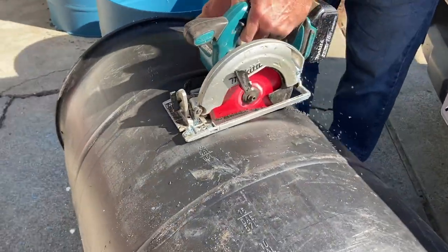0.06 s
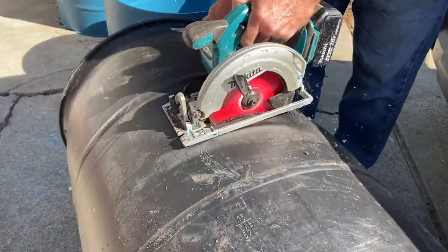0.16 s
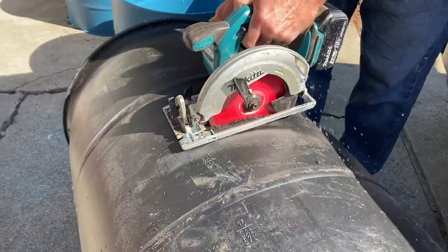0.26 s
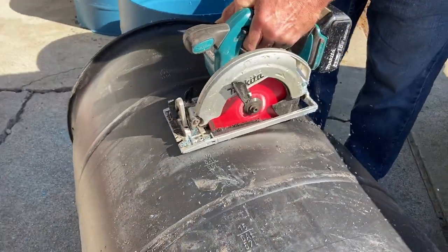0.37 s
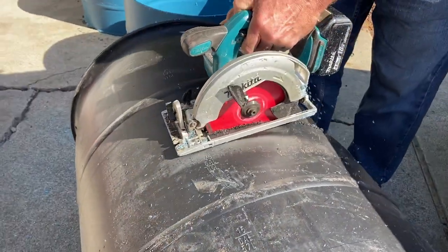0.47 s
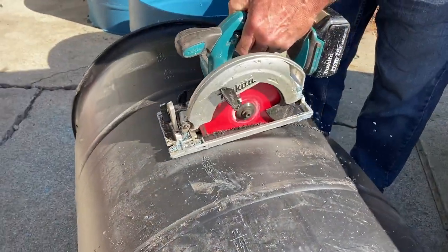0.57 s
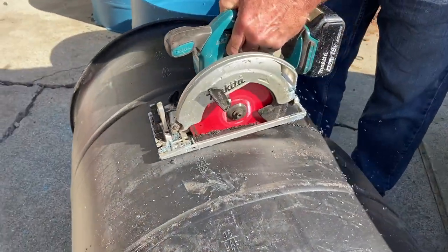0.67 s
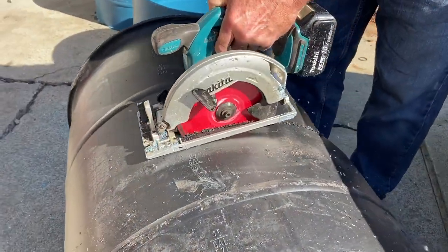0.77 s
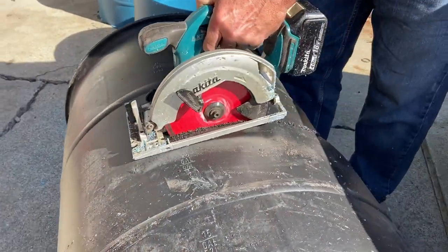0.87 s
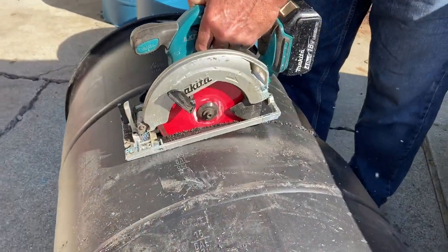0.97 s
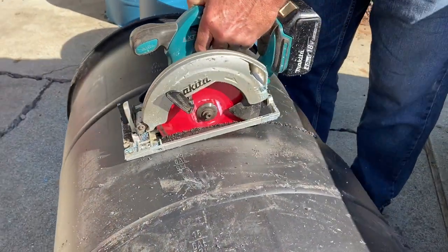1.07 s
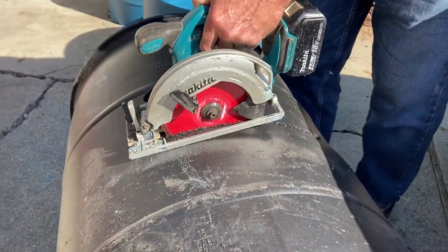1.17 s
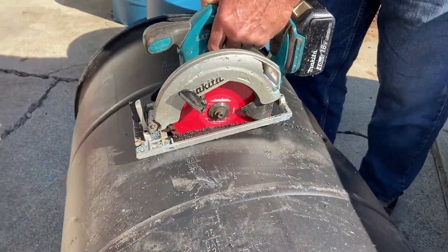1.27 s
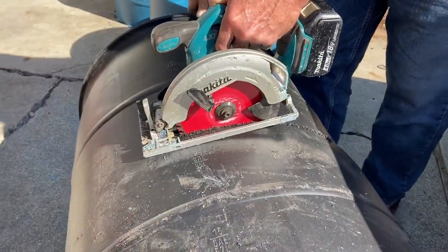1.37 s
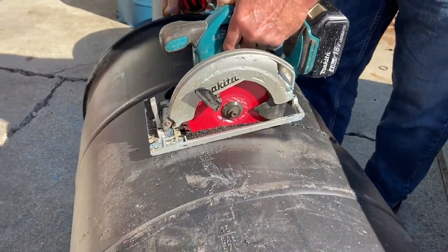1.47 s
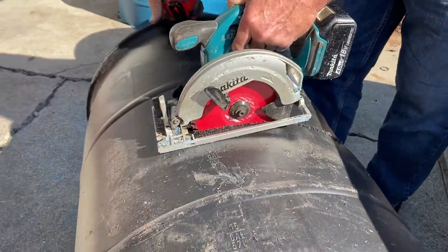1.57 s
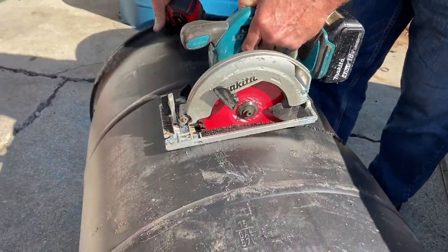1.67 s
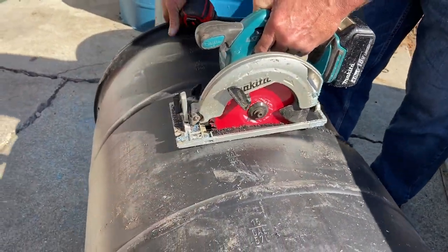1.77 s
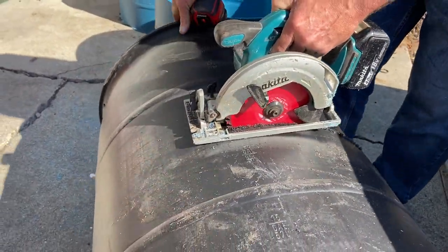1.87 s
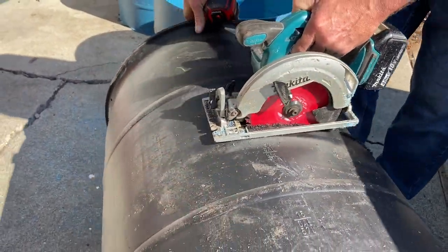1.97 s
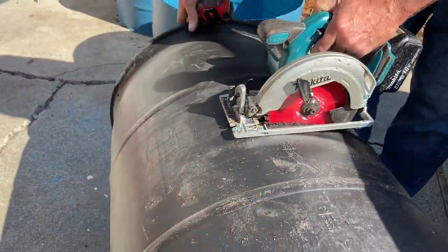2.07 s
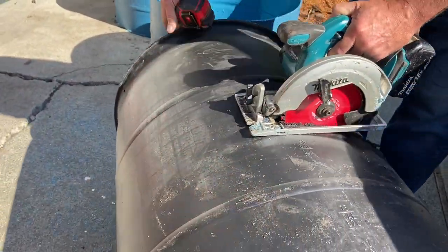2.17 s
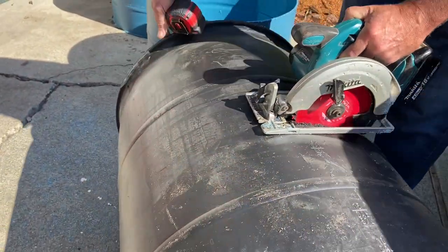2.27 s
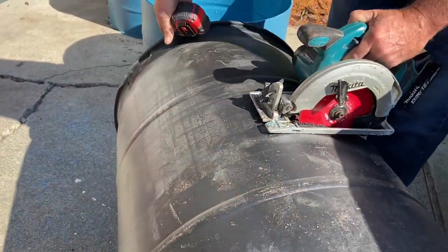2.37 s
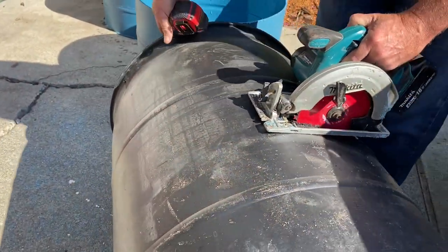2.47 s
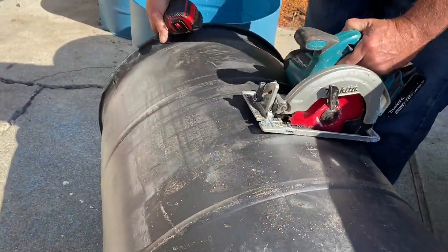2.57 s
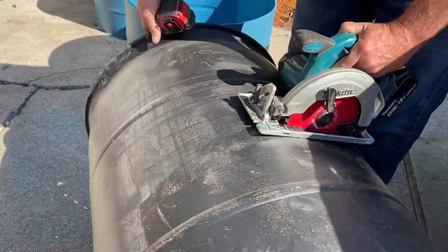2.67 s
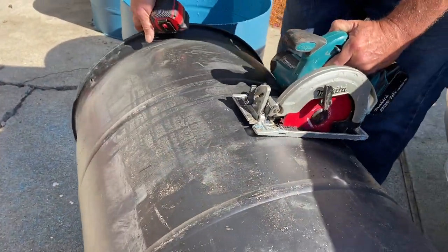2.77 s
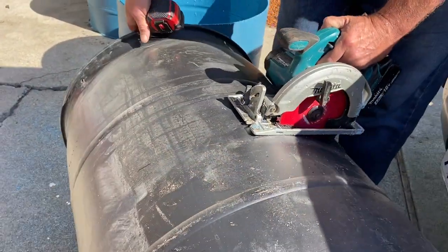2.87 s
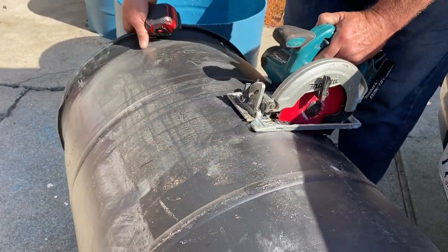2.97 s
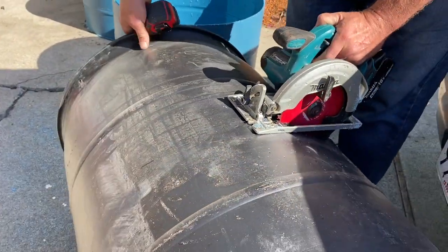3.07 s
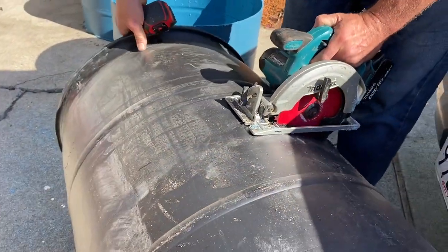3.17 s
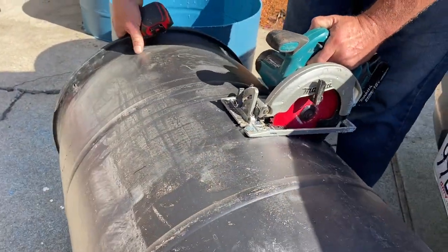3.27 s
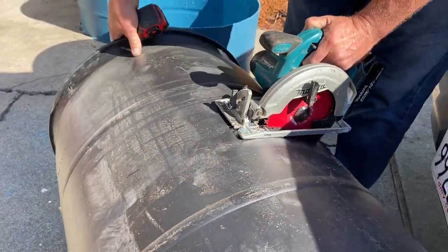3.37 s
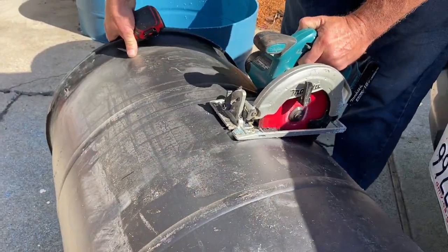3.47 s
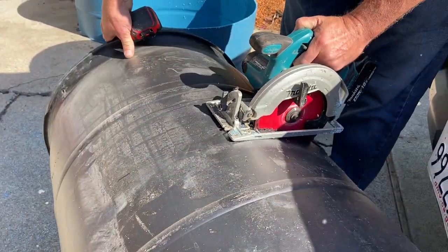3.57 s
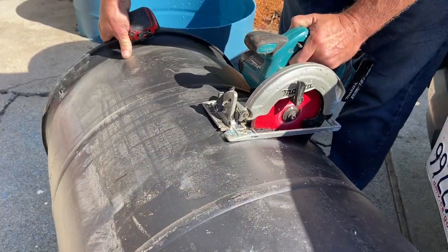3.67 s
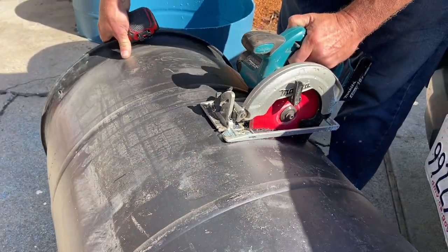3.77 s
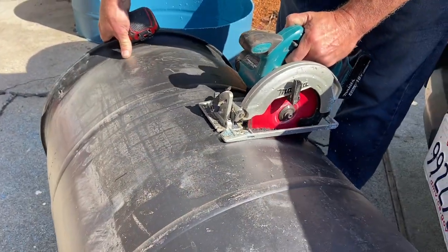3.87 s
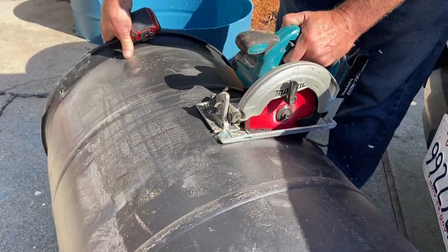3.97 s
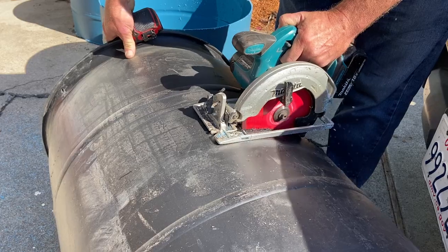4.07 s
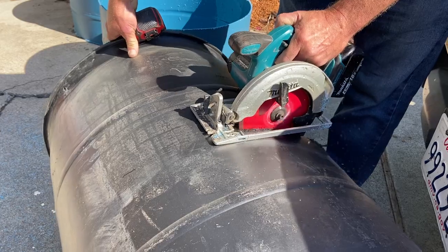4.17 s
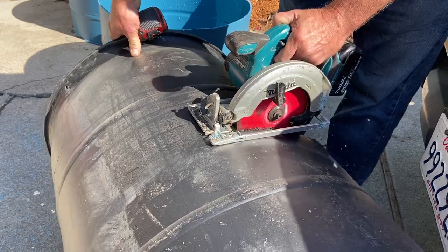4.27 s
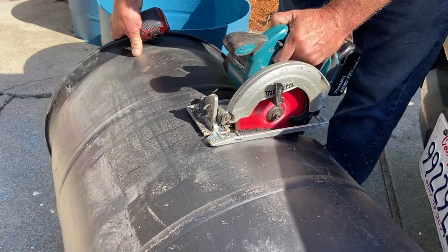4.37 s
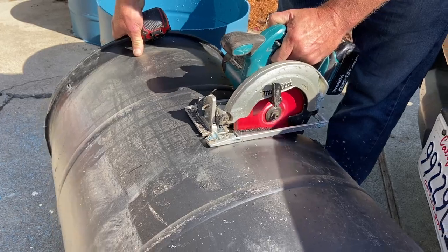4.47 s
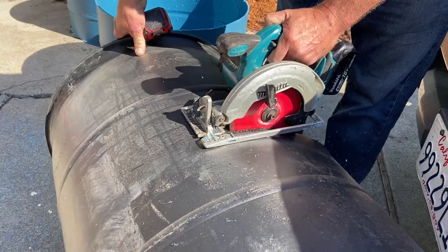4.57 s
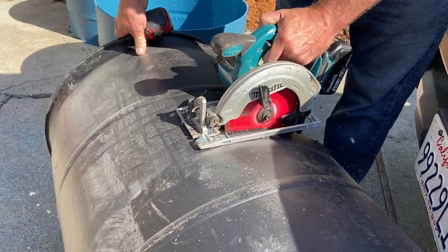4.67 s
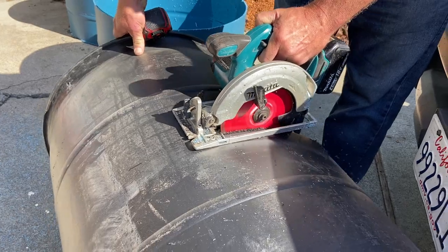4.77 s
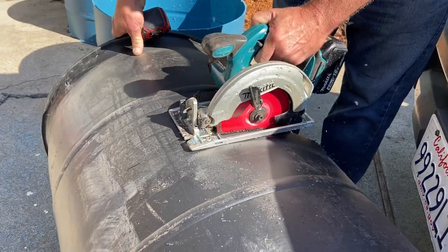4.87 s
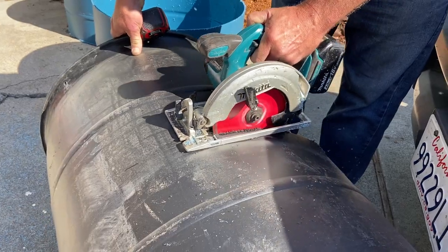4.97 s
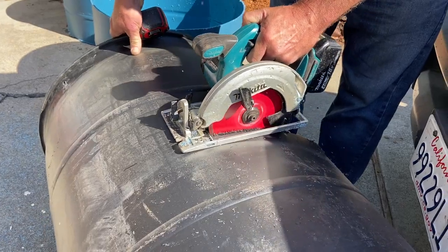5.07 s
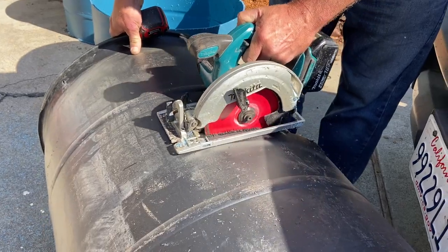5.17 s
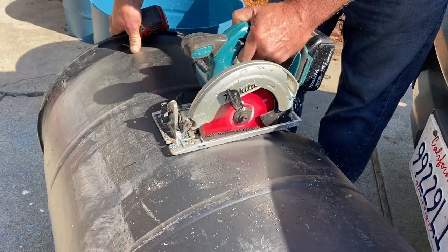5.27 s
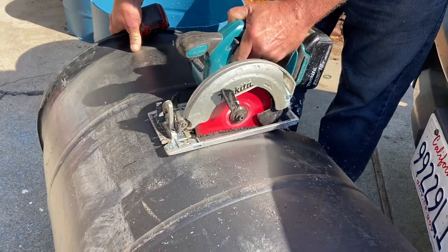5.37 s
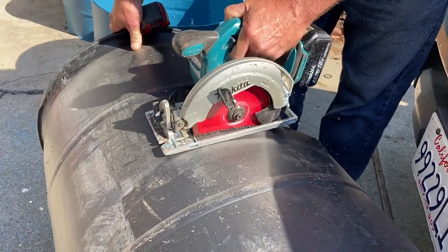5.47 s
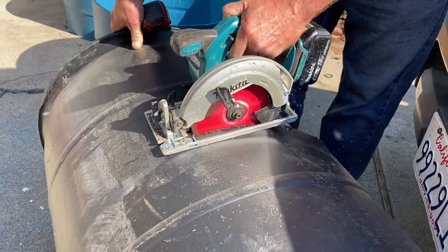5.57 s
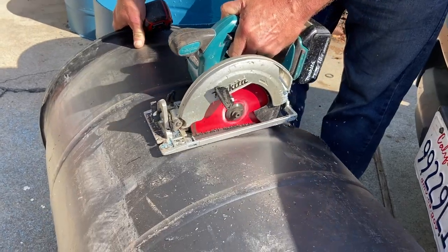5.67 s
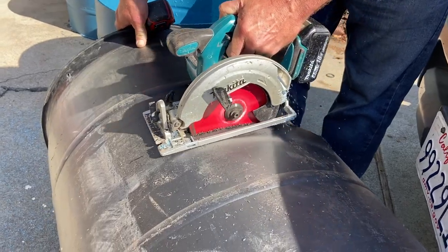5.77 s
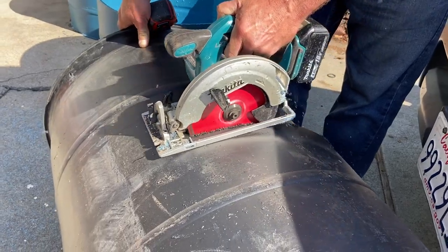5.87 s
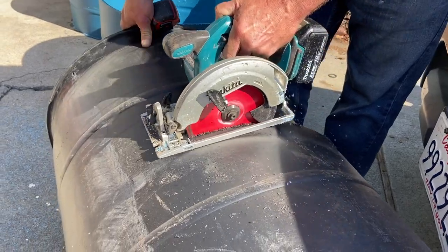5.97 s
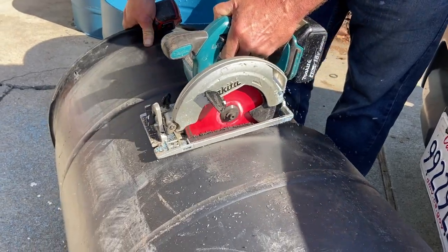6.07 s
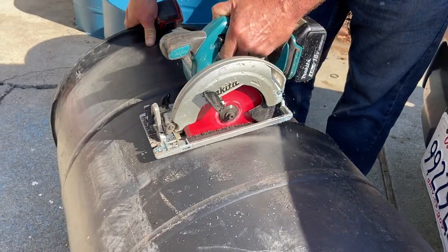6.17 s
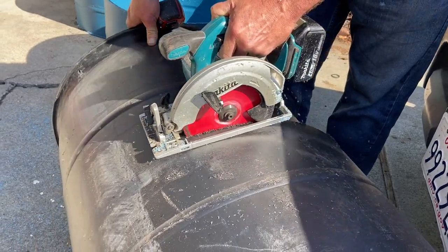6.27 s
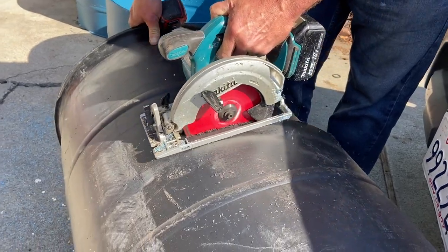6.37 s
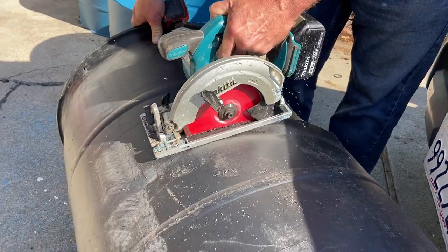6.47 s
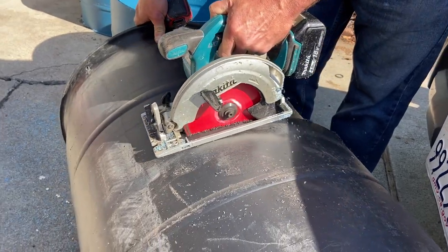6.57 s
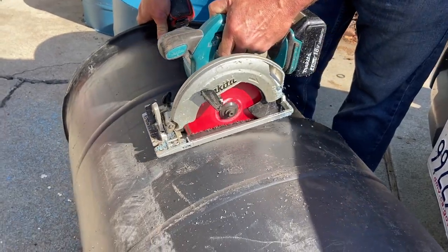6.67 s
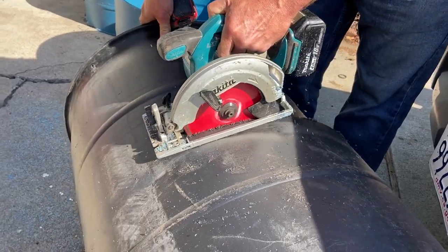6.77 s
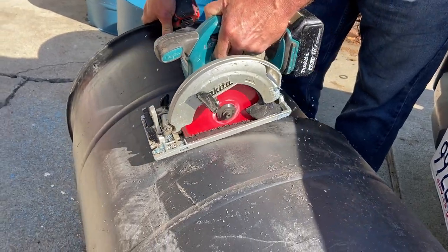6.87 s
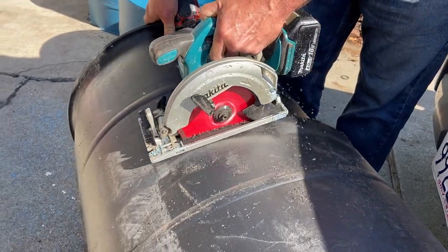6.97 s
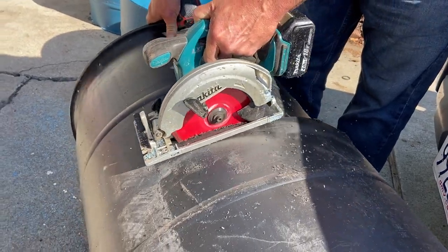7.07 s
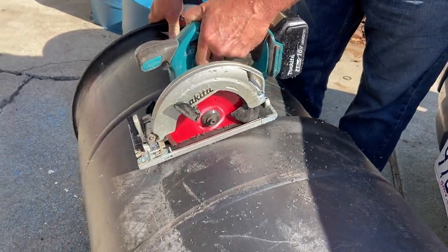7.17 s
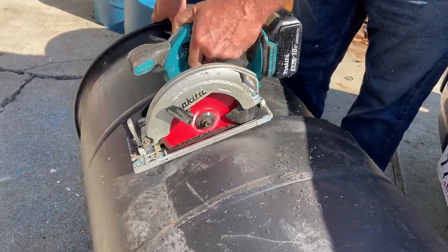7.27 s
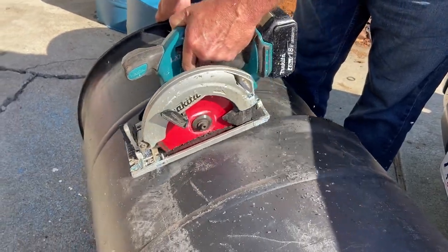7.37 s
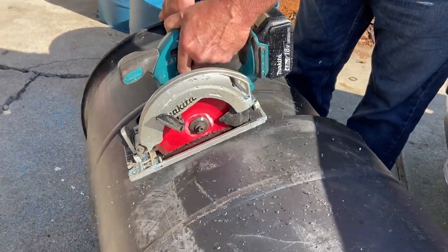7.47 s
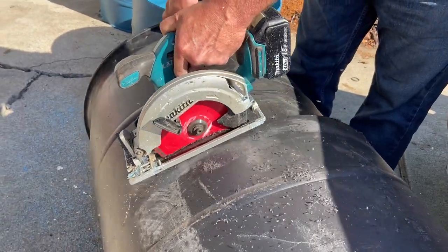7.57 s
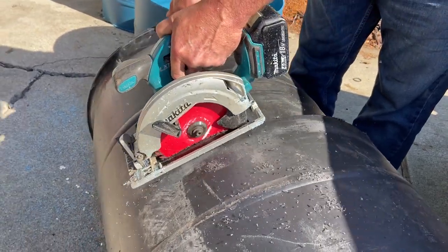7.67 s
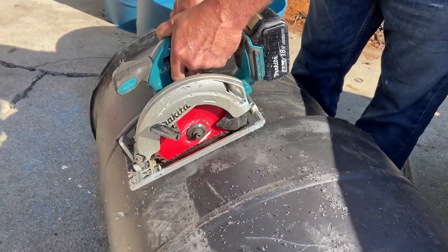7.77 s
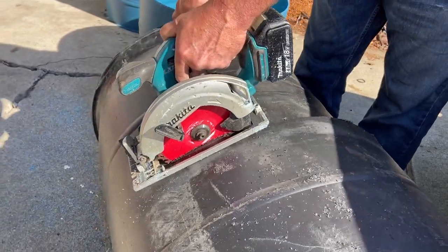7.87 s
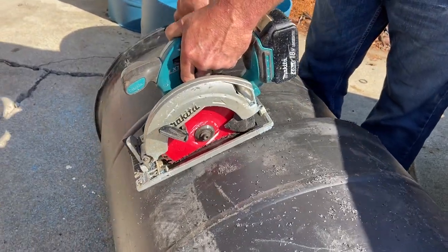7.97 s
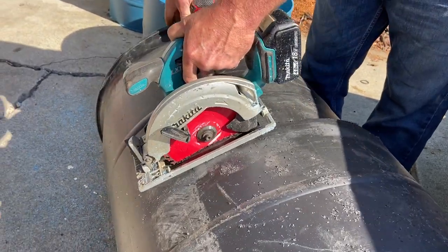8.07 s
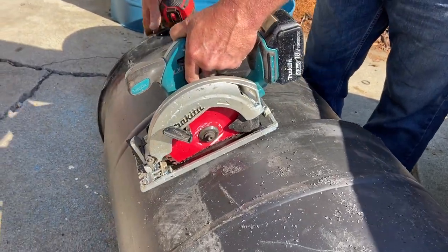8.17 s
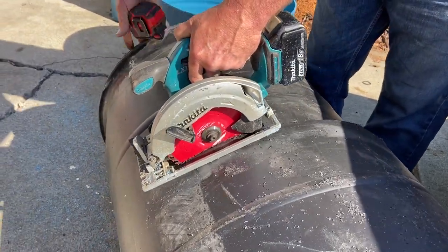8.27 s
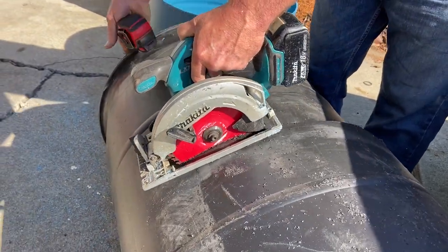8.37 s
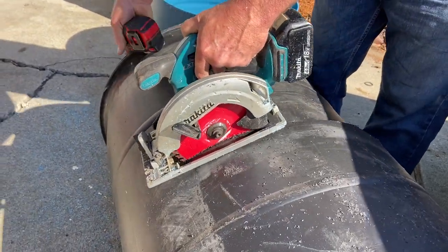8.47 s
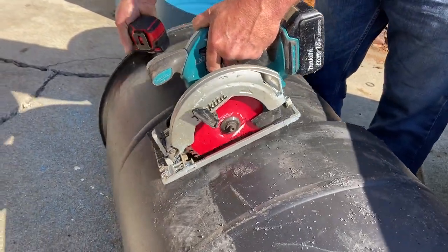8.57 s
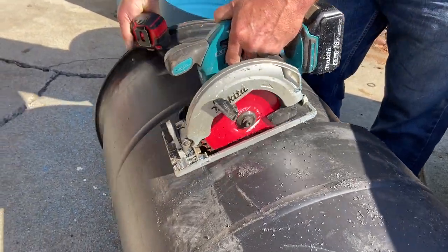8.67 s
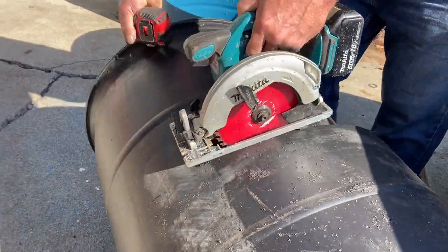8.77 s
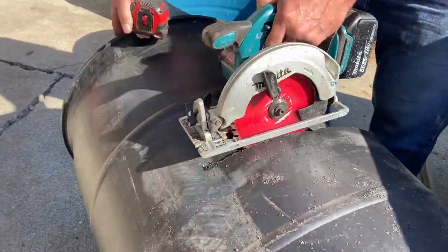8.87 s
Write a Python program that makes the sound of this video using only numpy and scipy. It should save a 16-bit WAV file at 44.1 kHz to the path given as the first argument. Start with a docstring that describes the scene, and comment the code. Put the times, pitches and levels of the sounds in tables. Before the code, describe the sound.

A cordless circular saw rasps through a hollow plastic drum, coasts down, shifts with soft knocks, then restarts for a longer cut that jams.

```python
"""Circular saw on a hollow drum

A cordless circular saw cuts a hollow plastic drum in a paved yard: tooth-burst noise through resonances.
The blade coasts down and rings as decaying sines; the saw is slid back and set down with a few knocks.
It starts again with a kick, labours through a second cut, jams to a stop and is shifted once more.
Whine and motor tones follow the teeth; filtered noise makes the rubbing, the boom and the yard air."""
import sys
import numpy as np
from scipy import signal
from scipy.fft import rfft, irfft, next_fast_len
from scipy.io import wavfile

SR = 44100
rng = np.random.default_rng(int(sys.argv[2]) if len(sys.argv) > 2 else 0)


def store_pcm(level_fs):
    """Save levels as 16-bit WAV."""
    pcm = np.round(np.clip(level_fs, -1, 1) * 32767).astype(np.int16)
    wavfile.write(sys.argv[1], SR, np.atleast_2d(pcm).T)


N = 393460
TIME = np.arange(N) / SR
FFT_SIZE = next_fast_len(N + 8192)
LOG_HZ = np.log(np.maximum(np.fft.rfftfreq(FFT_SIZE, 1 / SR), 1))


def from_db(db):
    """Decibels to gain."""
    return np.exp(np.asarray(db) * (np.log(10) / 20))


def rms_one(x):
    """Scale to unit power."""
    return x / np.sqrt(np.mean(x ** 2) + 1e-20)


def noise():
    """Two rows of white noise: direct and scattered."""
    return rng.standard_normal((2, N), dtype=np.float32)


def per_bin(points):
    """Read a table on a log-frequency axis."""
    hz, value = np.transpose(points)
    return np.interp(LOG_HZ, np.log(hz), value)


def colour(x, spectrum):
    """Give a signal a broad spectrum; rms 1."""
    gain = np.float32(from_db(per_bin(spectrum)))
    shaped = irfft(rfft(np.float32(x), FFT_SIZE) * gain, FFT_SIZE)
    return rms_one(shaped[..., :N])


def drift(rate):
    """Smooth chance with spread 1; a higher rate wanders faster."""
    step = 40   # samples between slow points
    r = np.exp(-2 * step * np.pi * rate / SR)
    chance = rng.standard_normal(N // step + 2002)
    settled = signal.lfilter([1], [1, -2 * r, r * r], chance)[2000:]
    slow = np.float32(rms_one(settled))
    between = np.float32(np.arange(step) / step)
    return (slow[:-1, None] + np.diff(slow)[:, None] * between).ravel()[:N]


def swell(start, end, attack_s, release_s):
    """Rise in a straight line, hold until the end, die away."""
    out = np.zeros(N, np.float32)
    span = slice(*np.searchsorted(TIME, [start, end + 10 * release_s]))
    rise = np.minimum((TIME[span] - start) / attack_s, 1)
    out[span] = rise * np.exp(-np.maximum(TIME[span] - end, 0) / release_s)
    return out


def ring(clicks, hz, t60):
    """A unit click sets a decaying sine of height 1 ringing."""
    r, w = np.exp(-np.log(1000) / (t60 * SR)), 2 * np.pi * hz / SR
    return signal.lfilter([0, np.sin(w)], [1, -2 * r * np.cos(w), r * r], clicks + 1e-18)


def resonate(force, peaks, peak_db):
    """Add resonances whose levels swell and fade as the contact point moves."""
    out = force.copy()
    for hz, width_hz, db in peaks:
        r = np.exp(-np.pi * abs(width_hz) / SR)
        poles = [1, -2 * r * np.cos(2 * np.pi * hz / SR), r * r]
        mode = signal.lfilter(np.array([1, 0, -1]) * (1 - r * r) / 2, poles, force)
        out += mode * from_db(db + peak_db + 2.5 * drift(1.5))
    return out


def moving_resonance(force, hz, width_hz):
    """One resonance whose centre may glide; gain 1 on top."""
    carrier = np.exp(2j * np.pi * np.cumsum(hz * np.ones(N)) / SR)
    r = np.exp(-np.pi * abs(width_hz) / SR)
    return 2 * np.real(signal.lfilter([1 - r], [1, -r], force / carrier) * carrier)


def hollow(x, t60, wet_db, dull_hz):
    """Sound lingers inside the drum as a dense decaying tail, duller than it went in."""
    age = TIME[:SR // 2]
    tail = rng.standard_normal(len(age)) * np.exp(-np.log(1000) * age / t60)
    tail = signal.lfilter([1], [1, -np.exp(-2 * np.pi * dull_hz / SR)], tail)
    tail = np.float32([tail / np.linalg.norm(tail)])
    return x + from_db(wet_db) * signal.fftconvolve(np.float32(x), tail, axes=1)[:, :N]


# Trigger pulls. Each row: on in s, off in s, coasting time in s, bend of the run-down (exponent),
# snatch of the slowing teeth in dB, share of full speed below which the cut fades.
RUNS = [(-1.0, .675, .97, 2.0, 12.5, .95), (3.453, 7.39, .455, 1.15, 18, .55)]
# Pace under power before binding. Each row: time in s, teeth per s.
PACE = [(0, 1850), (.25, 1878), (.66, 1902), (3.9, 1720), (4.53, 1852), (4.7, 1850), (4.9, 1900),
        (5.2, 1858), (6.08, 1845), (6.43, 1875), (6.93, 1832), (7.37, 1762)]
# Blade binds in the kerf and recovers. Each row: deepest point in s, half length in s, teeth per s lost.
BINDINGS = [(4.04, .1, 135), (4.33, .13, 140), (6.63, .185, 545)]
FULL_TEETH_PER_S, SPIN_UP_S = 1900, .085
FADE_DB_PER_DECADE = 25.5   # a slow blade stops cutting


def blade_speed():
    """The blade spins up, dips where it binds and coasts down: share of full speed, snatch dB, bite gain."""
    pace = np.interp(TIME, *np.transpose(PACE))
    for s, half_s, lost in BINDINGS:
        pace = pace - lost * np.maximum(1 - abs(TIME - s) / half_s, 0)
    share, snatch_db, grip = 0, 0, 0
    for on, off, coast_s, bend, db, fade_below in RUNS:
        spin_up = 1 - np.exp(-np.clip((TIME - on) / SPIN_UP_S, 0, 20))
        coast = np.clip(1 - (TIME - off) / coast_s, 0, 1) ** bend
        share = share + spin_up * coast
        snatch_db = snatch_db + db * (1 - coast) * (coast > 0)
        grip = grip + np.minimum(spin_up * coast / fade_below, 1)
    return share * pace / FULL_TEETH_PER_S, snatch_db, grip ** (FADE_DB_PER_DECADE / 20)


TEETH = 24
REPEAT_FIRST_DB, REPEAT_SECOND_DB = 1, -3.5   # per-turn repeating part in each cut, at top tooth rate


def tooth_force(rate, teeth_passed, chatter_db):
    """Each tooth tears off a chip in a burst; part of the rasp repeats every turn, in a slow-changing pattern."""
    turns = teeth_passed / TEETH
    burst = rms_one(from_db(chatter_db * drift(46)) * np.exp(-1.0 * (teeth_passed % 1)))
    rim = rng.standard_normal((2, 512, 2)) @ [1, 1j]
    pattern = np.exp(1j * drift(.5))
    repeating = []
    for edge in rim:
        around = np.interp(turns % 1, np.linspace(0, 1, len(edge)), edge)
        repeating.append(np.real(pattern * around))
    repeat_db = np.where(TIME < RUNS[1][0], REPEAT_FIRST_DB, REPEAT_SECOND_DB)
    repeat = from_db(repeat_db) * (rate / rate.max()) ** 4
    return burst * (noise() + repeat * np.array(repeating)) / np.sqrt(1 + repeat ** 2 / 2)


def wandering(force, wet_db):
    """The short echoes in the wall change their pattern as the cut moves on."""
    weights = np.array([drift(.8) for _ in range(3)])
    weights /= np.linalg.norm(weights, axis=0)
    out = force
    for weight in weights:
        echoes = hollow(force, t60=.06, wet_db=wet_db, dull_hz=18900) - force
        out = out + weight * echoes
    return out


# Teeth sing out. Each row: start in s, end in s, level in dB.
WHINES = [(-.1, .66, -30.5), (.67, 1.0, -27.5), (1.0, 1.12, -33), (3.99, 4.08, -26), (4.13, 4.24, -25.5),
          (4.478, 4.8, -32), (4.8, 6.08, -36), (6.44, 7.36, -36.5), (7.39, 7.53, -28.5),
          (7.565, 7.705, -25)]
WHINE_ATTACK_S, WHINE_RELEASE_S = .035, .025
GROWL_DEPTH, GROWL_HZ, GROWL_WIDTH_HZ = 1.0, 820, 190


def whine(speed, rate, teeth_passed):
    """Passing teeth sing at the tooth rate; the octave rings the wall as it sweeps through the growl band."""
    # roughens as the slowing teeth snatch at the plastic
    rough_db = np.clip(1.6 + 6 * (1 - speed), 1.6, 2.6) * drift(60)
    singing = sum(from_db(db) * swell(start, end, WHINE_ATTACK_S, WHINE_RELEASE_S)
                  for start, end, db in WHINES)
    phase = np.float32(2 * np.pi * (teeth_passed % 1))
    in_band = np.exp(-((2 * rate - GROWL_HZ) / GROWL_WIDTH_HZ) ** 2)
    growl = GROWL_DEPTH * in_band * np.sin(2 * phase)
    return singing * np.minimum(10 * speed, 1) * from_db(rough_db) * (np.sin(phase) + growl)


# Motor tones, one entry each: multiple of the motor's turn.
MOTOR_ORDERS = [2, 7, 8, 10.35]
# Motor tones, one entry each: level in dB before MOTOR_DB.
MOTOR_ORDER_DB = [0.13, 0.9, 0.31, 0.53]
TEETH_PER_MOTOR_TURN = 4
MOTOR_DB = -20.5   # against the bite


def motor(teeth_passed):
    """Fan and gear teeth sing at multiples of the motor's turn, each fluttering on its own."""
    phase = 2 * np.pi * teeth_passed / TEETH_PER_MOTOR_TURN
    tones = 0
    for order, db in zip(MOTOR_ORDERS, MOTOR_ORDER_DB):
        tones = tones + from_db(db + 3.5 * drift(20)) * np.sin(order * phase)
    return from_db(MOTOR_DB) * tones


# Wall drones under the blade. Each row: start in s, end in s, first Hz, last Hz, level in dB.
DRONE = [(-.1, 0.334, 468.6, 464.3, -41.5), (4.638, 5.121, 562.5, 510.3, -40.5)]
DRONE_ATTACK_S, DRONE_RELEASE_S = 0.041, 0.025


def drone():
    """The wall flutters in one narrow mode while the saw presses on it."""
    out = 0
    for start, end, first_hz, last_hz, db in DRONE:
        phase = 2 * np.pi * np.cumsum(np.interp(TIME, [start, end], [first_hz, last_hz])) / SR
        pressed = from_db(db) * swell(start, end, DRONE_ATTACK_S, DRONE_RELEASE_S)
        out = out + pressed * (drift(4.1) * np.cos(phase) + drift(14) * np.sin(phase))
    return out


# Blade rubs the side of the kerf. Each row: start in s, end in s, mode in Hz, level in dB.
SINGING = [(-.1, 0.261, 939, -31.5), (0.1, 0.625, 1365, -35.5), (.3, 0.498, 1976, -31),
           (0.451, 0.614, 3657, -31.5), (4.1, 4.298, 1128, -31), (5.45, 5.824, 3290, -27),
           (5.5, 6.051, 3686, -30), (6.8, 7.441, 3132, -38)]
SINGING_ATTACK_S, SINGING_RELEASE_S = 0.043, .04
SINGING_FLUTTER_HZ = 9


def singing_modes():
    """Rubbed by the kerf, single modes of blade and guard swell into fluttering tones."""
    out = np.zeros(N)
    flutter = drift(SINGING_FLUTTER_HZ) + 1j * drift(SINGING_FLUTTER_HZ)
    for start, end, hz, db in SINGING:
        rubbed = swell(start, end, SINGING_ATTACK_S, SINGING_RELEASE_S)
        on = np.flatnonzero(rubbed)
        own = flutter[(on + rng.integers(N)) % N]
        tone = np.real(own * np.exp(2j * np.pi * hz * TIME[on])) / np.sqrt(2)
        out[on] += from_db(db) * rubbed[on] * tone
    return out


# Hand feeding the saw, first cut. Each row: time in s, bite in dB, wall flexing in dB against the bite.
CUT_A = [(0.0, -19, -17.5), (0.13, -25.5, -10), (0.486, -24.5, -17), (0.672, -26, -15.5), (0.7, -22, -12)]
# Second cut. Each row: time in s, bite in dB, wall flexing in dB against the bite.
CUT_B = [(3.465, -28.5, 7), (3.53, -23, -14), (3.63, -20, -16.5), (3.71, -27, -7.5), (3.72, -22, -14),
         (3.89, -16.5, -16), (4.32, -23, -12), (4.44, -22.5, -17.5), (4.66, -24.5, -16.5),
         (4.74, -30.5, -4.5), (4.96, -26, -13.5), (5.11, -27, -9), (5.21, -23, -18), (5.7, -17.5, -19.5),
         (5.88, -24, -14.5), (5.98, -21.5, -21.5), (6.54, -23.5, -21), (6.61, -29.5, -13),
         (6.69, -24, -19.5), (7.07, -24, -15), (7.16, -30, -10), (7.23, -25, -14.5), (7.36, -24.5, -8.5),
         (7.42, -27.5, -12)]
# Teeth snag and thump the wall. Each row: time in s, extra flexing in dB.
SNAGS = [(4.29, 3.5), (6.25, 8), (7.12, 7)]
SNAG_HALF_S = .022
# Wall resonances. Each row: centre in Hz, width in Hz, level in dB before peak_db.
WALL_PEAKS = [(140, 3.1, 10.5), (232.2, 13, 8.5), (498, 5.5, -8), (670, 31, 9), (972, 29, 8.5)]
# Guard and shoe resonances. Each row: centre in Hz, width in Hz, level in dB before peak_db.
HOUSING_PEAKS = [(927, 16, 6.5), (1130, 11, 6), (1314, 150, 3.5), (1973, 56, 12), (2150, 14, 3.5),
                 (2187, 18, 8)]
# Blade resonances. Each row: centre in Hz, width in Hz, level in dB before peak_db.
BLADE_PEAKS = [(2937, 58, 0.5), (3200, 29, 0), (3730, 50, -1), (4060, 38, 2.5), (4230, 39, 1.5),
               (4580, 53, -1.5), (6350, 87, -0.5), (6670, 180, -3.5), (7710, 70, 0)]
# Strongest blade resonance, shifting with its grip in the kerf. Each row: time in s, centre in Hz, level in dB.
KERF_RESONANCE = [(0.099, 3417, -7.5), (.4, 3362, 4.5), (.6, 3426, -0.5), (3.6, 3684, -1.5), (4.2, 3680, 3),
                  (4.8, 3422, -3), (5.601, 3325, -4), (6.2, 3495, 1), (7.3, 3114, 0)]
KERF_WIDTH_HZ = 200
# Broad colour of the wall. Each row: frequency in Hz, relative density in dB.
WALL = [(60, -37.5), (130, -20.5), (270, -6), (430, -1), (750, -1), (950, -12.5), (1300, -16),
        (2500, -59.5)]
# Broad colour of guard and shoe. Each row: frequency in Hz, relative density in dB.
HOUSING = [(450, -35), (800, -8), (1050, -1), (1350, -1), (1650, -3.5), (2000, -3.5), (2450, -9),
           (3200, -17), (6000, -51.5)]
# Broad colour of the rasping blade. Each row: frequency in Hz, relative density in dB.
RASP = [(1200, -28), (2200, -10.5), (2700, -4.5), (3000, -2), (3400, 1), (3950, -2.5), (4400, -3),
        (5400, -7), (6000, -4.5), (6800, 0), (8300, -4.5), (10000, -4), (15500, -4.5), (17000, -19)]
# Broad colour of the air in the drum. Each row: frequency in Hz, relative density in dB.
CAVITY = [(20, -39.5), (42, -4), (65, -1), (82, 7), (110, -11.5), (150, -5), (260, -20), (600, -55.5)]
RASP_DB, HOUSING_DB, WALL_DB, CAVITY_DB = 0.5, -0.5, -1.47, -30   # against the bite, before flexing
HOUSING_FOLLOWS, CAVITY_FOLLOWS = 0.61, 0.34   # share of the wall's flexing dB
WANDER_DB = -6.5   # short wall echoes against the direct rasp
DULL_BELOW = .25   # share of full speed below which the rasp fades ahead of the wall


def saw():
    """The teeth shake the drum wall, the housing and the blade; their passing sings as a whine."""
    speed, snatch_db, grip = blade_speed()
    judder = .0012 + .075 * (1 - speed) ** 2   # a slowing blade turns less evenly
    rate = FULL_TEETH_PER_S * speed * (1 + judder * drift(45))
    teeth_passed = np.cumsum(rate) / SR

    # slowing teeth cut less, but snatch at the wall and shake it more
    s, bite_db, flex_db = np.transpose(list(CUT_A) + list(CUT_B))
    bite = from_db(np.interp(TIME, s, bite_db)) * grip
    flex_db = np.interp(TIME, s, flex_db) + snatch_db
    snag_db = sum(db * np.exp(-((TIME - at) / SNAG_HALF_S) ** 2) for at, db in SNAGS)

    force = tooth_force(rate, teeth_passed, chatter_db=0.85)
    uneven_feed = from_db(0.84 * drift(14.0))
    force = wandering(force * uneven_feed, wet_db=WANDER_DB)

    wall = colour(resonate(force, WALL_PEAKS, peak_db=-5.5), WALL)
    wall = from_db(WALL_DB + flex_db + snag_db) * wall
    housing = colour(resonate(force, HOUSING_PEAKS, peak_db=-7.0), HOUSING)
    housing = from_db(HOUSING_DB + HOUSING_FOLLOWS * flex_db) * housing

    kerf_s, kerf_hz, kerf_db = np.transpose(KERF_RESONANCE)
    kerf = moving_resonance(force, np.interp(TIME, kerf_s, kerf_hz), KERF_WIDTH_HZ)
    kerf = from_db(np.interp(TIME, kerf_s, kerf_db)) * kerf
    rasp = colour(resonate(force, BLADE_PEAKS, peak_db=-5.0) + kerf, RASP)
    rasp = from_db(RASP_DB) * np.minimum(speed / DULL_BELOW, 1) ** .25 * rasp

    cavity = from_db(CAVITY_DB + CAVITY_FOLLOWS * flex_db) * colour(noise(), CAVITY)
    out = bite * (wall + housing + rasp + cavity) + chatter(force)
    driven = speed ** 6   # motor tones drop out below full speed
    out[0] += whine(speed, rate, teeth_passed) + driven * bite * motor(teeth_passed)
    out[0] += drone() + singing_modes()
    return hollow(out, t60=0.38, wet_db=-15.5, dull_hz=4030)


# Yard air. Each row: frequency in Hz, relative density in dB.
YARD = [(20, -24), (45, -0.5), (85, 0), (300, -24), (700, -27), (9000, -49.5), (16000, -44)]
YARD_DB = -65


def yard():
    """Faint air of the yard: steady coloured noise."""
    return from_db(YARD_DB) * colour(noise(), YARD)


GRAINS_PER_S, GRAIN_SPREAD_DB = 64, 2


def grains():
    """Specks of dust crack at random, a few louder than the rest; rms 1."""
    born = rng.random(N) < GRAINS_PER_S / SR
    sizes = from_db(GRAIN_SPREAD_DB * np.minimum(rng.exponential(1, N), 3))
    cracks = signal.lfilter([1], [1, -np.exp(-1 / (.002 * SR))], born * sizes + 1e-18)
    return rms_one(cracks * noise())


# Shoe pushed over the drum. Each row: start in s, end in s, swell in s, rubbing in dB, gritty hiss in dB,
# cavity boom in dB.
SHOVES = [(1.309, 1.481, .04, -47, -62, -54.5), (1.833, 2.008, 0.13, -77.5, -61, -71.5),
          (2.046, 2.131, 0.052, -56.5, -68, -55.5), (2.387, 2.467, 0.039, -80, -100, -59),
          (2.537, 2.954, 0.025, -62, -84.5, -61), (2.986, 3.11, .02, -57, -86.5, -47.5),
          (3.255, 3.353, 0.038, -68.5, -78, -64), (3.45, 3.512, .02, -43, -84.5, -40),
          (7.659, 7.769, 0.07, -35, -69.5, -44.5), (8.525, 8.829, 0.064, -65, -83, -62),
          (8.815, 8.928, 0.0434, -53, -78.5, -57.5)]
SHOE_RELEASE_S, BOOM_RELEASE_S = 0.037, 0.03
GRAIN_DB = -5.5   # grain rms, mixed into the friction ahead of the grit colour
# Rubbing colour. Each row: frequency in Hz, relative density in dB.
RUB = [(100, -42.5), (200, -5), (380, -0.5), (700, -10), (1200, -20.5), (4000, -49)]
# Gritty hiss colour. Each row: frequency in Hz, relative density in dB.
GRIT = [(600, -2.5), (1500, 0.5), (2800, -3), (5000, -13), (7000, -14), (10000, -23.5), (16000, -25.5)]
# Light clicks of shoe and blade guard. Each row: time in s, level in dB before level_db.
TICKS = [(2.1011, -48.5), (2.548, -52), (2.6094, -56), (2.827, -51), (2.967, -56), (3.037, -53),
         (3.341, -54.5), (3.449, -37.5), (8.526, -57.5), (8.8305, -51), (8.913, -49)]


def handling():
    """The shoe rubs and clicks over dusty plastic while the drum booms softly."""
    rub_gain, grit_gain, boom_gain = 0, 0, 0
    for start, end, swell_s, rub_db, grit_db, boom_db in SHOVES:
        push = swell(start, end, swell_s, SHOE_RELEASE_S)
        rub_gain = rub_gain + from_db(rub_db) * push
        grit_gain = grit_gain + from_db(grit_db) * push
        boom_gain = boom_gain + from_db(boom_db) * swell(start, end, swell_s, BOOM_RELEASE_S)
    friction = noise() * from_db(2.7 * drift(60))
    rub = rub_gain * colour(resonate(friction, WALL_PEAKS, peak_db=-4.0), RUB)
    grit = grit_gain * colour(friction + from_db(GRAIN_DB) * grains(), GRIT)
    boom = boom_gain * colour(noise(), CAVITY)
    return rub + grit + boom + scuffs(TICKS, decay_s=0.0079, level_db=-9.5)


# Free ringing of the steel blade. Each row: mode in Hz, dB after coasting, dB after jamming, t60 in s.
BLADE_MODES = [(211, -61, -48, 1.45), (870, -81.5, -50, 0.7), (1230, -79, -54, 0.57),
               (1460, -68, -72, 1.04), (2340, -68, -63, 0.9), (3525, -69, -86.5, 1.7)]
# Blade comes free. Each entry: time in s.
RING_STARTS = [1.42, 7.78]


def blade_ring():
    """Once clear of the plastic the steel disc rings on."""
    out = np.zeros((2, N))
    for hz, *levels_db, t60 in BLADE_MODES:
        clicks = np.zeros(N)
        clicks[(np.array(RING_STARTS) * SR).astype(int)] = from_db(levels_db)
        out[0] += ring(clicks, hz, t60)
    return out


# Thin squeaks as the saw is dragged back. Each row: centre in s, half length in s, pitch in Hz, level in dB.
SQUEAKS = [(1.89, .05, 4680, -77), (2.45, .05, 4700, -82)]


def squeaks():
    """The shoe sticks and slips into short, slightly unsteady sines."""
    out = np.zeros((2, N))
    for s, half_s, hz, db in SQUEAKS:
        envelope = from_db(db) * np.exp(-((TIME - s) / half_s) ** 4)
        out[0] += envelope * np.sin(2 * np.pi * hz * TIME + .7 * drift(40))
    return out


# Saw knocks the drum. Each row: time in s, knock in dB before body_db or level_db, boom in dB before boom_db.
KNOCKS = [(2.018, -48, -69.5), (2.078, -52.5, -54.5), (2.12, -49, -71), (2.548, -56.5, -58.5),
          (3, -54.5, -47.5), (3.04, -49, -43.5), (3.088, -50, -44.5), (3.456, -22, -36), (7.635, -20, -54),
          (8.099, -59.5, -79.5), (8.609, -52.5, -60.5)]
# Modes of a knock. Each row: frequency in Hz, level in dB against the knock before body_db, t60 in s.
KNOCK_MODES = [(185, -11, 0.5), (212.4, -13.5, 0.13), (340, -15.5, 0.14), (557, 7.5, 0.069), (727, 9, 0.13),
               (741, 8.5, 0.037), (1175, -0.5, 0.099), (1250, -2, 0.056)]


def knocks(body_db, boom_db):
    """A knock rings the wall's modes and booms in the air inside."""
    s, peak_db, cavity_db = np.transpose(KNOCKS)
    at, out = (s * SR).astype(int), np.zeros((2, N))
    clicks = np.zeros(N)
    for hz, db, t60 in KNOCK_MODES:
        height = from_db(peak_db + db + body_db + rng.normal(0, 1, len(at)))
        clicks[at] = height * rng.choice([-1, 1], len(at))
        out[0] += ring(clicks, hz, t60)
    clicks[at] = from_db(cavity_db + boom_db)
    out[0] += ring(clicks, 47, 0.22) - ring(clicks, 112, 0.24)
    return out + scuffs(KNOCKS, decay_s=0.0072, level_db=-31.0)


# Contact burst colour. Each row: frequency in Hz, relative density in dB.
CLICK = [(500, 5), (1500, 14), (5000, -1.5), (15000, -3)]


def scuffs(rows, decay_s, level_db):
    """Each contact crushes dust in a short bright burst."""
    s, peak_db = np.transpose(rows)[:2]
    clicks = np.zeros(N)
    clicks[(s * SR).astype(int)] = from_db(peak_db + level_db)
    envelope = signal.lfilter([1], [1, -np.exp(-1 / (decay_s * SR))], clicks + 1e-18)
    return envelope * colour(noise(), CLICK)


# Blade chatters on the side of the kerf. Each row: start in s, end in s, centre in Hz, width in Hz, level in dB.
CHATTERS = [(4.012, 4.082, 2500, 3010, -29), (5.348, 5.384, 2900, 2008, -25.5)]
CHATTER_EDGE_S = .01


def chatter(force):
    """Brief harsh surges of the rasp, through the same resonance twice."""
    out = 0
    for start, end, hz, width_hz, db in CHATTERS:
        once = moving_resonance(force, hz, width_hz)
        harsh = rms_one(moving_resonance(once, hz, width_hz))
        out = out + from_db(db) * swell(start, end, CHATTER_EDGE_S, CHATTER_EDGE_S) * harsh
    return out


# Two microphone ports. Each row: frequency in Hz, likeness (0 to 1).
LIKENESS = [(60, 1), (500, 0.84), (2200, 0.63), (4000, 0.97), (5500, 0.64), (6800, 0.85), (8000, 0.72),
            (9000, 1), (10200, 0.093), (11200, 0.93), (12300, 0.98), (13400, 0.96)]
# Two microphone ports. Each row: frequency in Hz, left lead in radians.
PORT_PHASE = [(200, 0), (2000, .4), (6300, .35), (7300, -.1), (9050, -3.14), (10800, -6.2), (11600, -6.4),
              (13400, -9.42), (15200, -12.5)]


def ports(pair):
    """Rows to left, right: direct sound reaches both ports with a phase shift, scattered sound differs."""
    direct, scattered = rfft(np.float32(pair), FFT_SIZE)
    alike = np.clip(per_bin(LIKENESS), 0, .99)
    turn = np.exp(.5j * per_bin(PORT_PHASE))
    mid = np.sqrt((1 + alike) / 2) * direct
    side = np.sqrt((1 - alike) / 2) * scattered
    left_right = irfft(np.array([(mid + side) * turn, (mid - side) / turn]), FFT_SIZE)[:, :N]
    return left_right * from_db(0.26 * np.array([[1], [-1]]))   # left slightly louder


def scene():
    """Saw and drum close by, over the faint air of the yard."""
    contacts = handling() + squeaks() + knocks(body_db=-11.5, boom_db=2.0)
    return ports(saw() + yard() + blade_ring() + contacts)


CUTOFF_HZ = 15900


def record(dry):
    """The deep bass is rolled off and the top is cut steeply."""
    dry = signal.sosfilt(signal.butter(4, 36, "high", fs=SR, output="sos"), dry)
    return signal.sosfilt(signal.ellip(10, .2, 80, CUTOFF_HZ, fs=SR, output="sos"), dry)


dry = scene()
out = record(dry)
store_pcm(out)
```